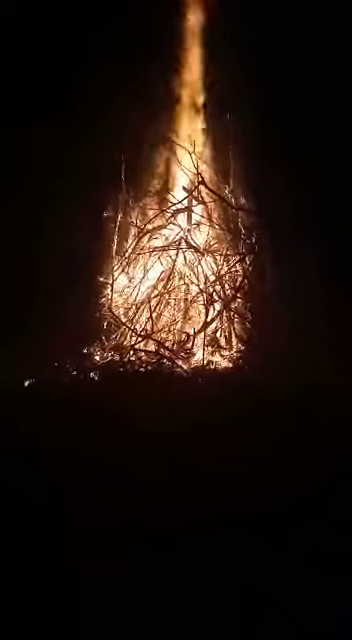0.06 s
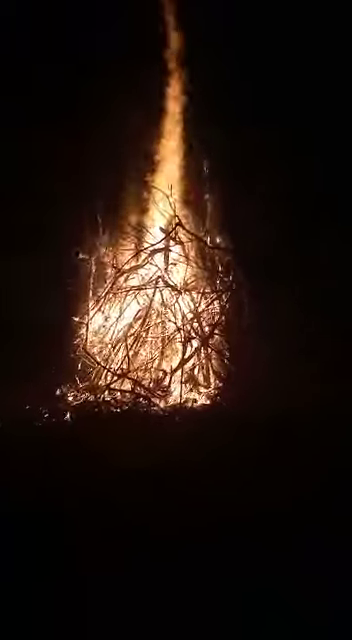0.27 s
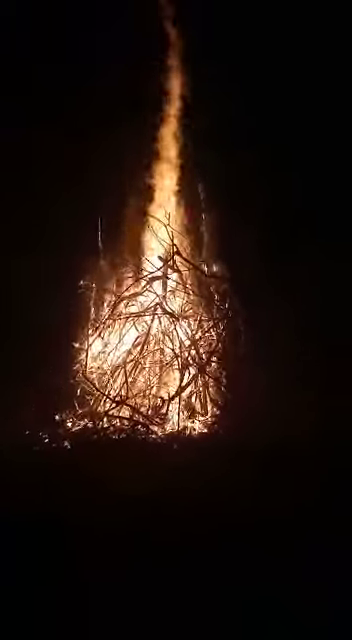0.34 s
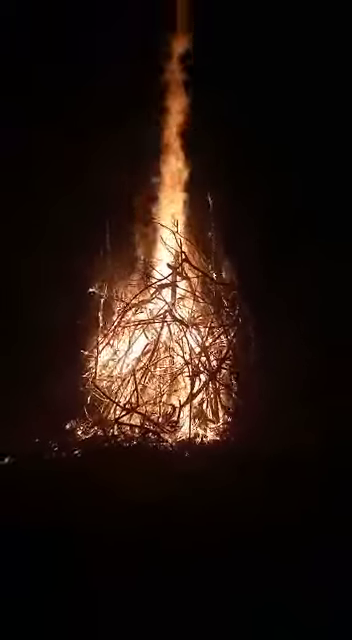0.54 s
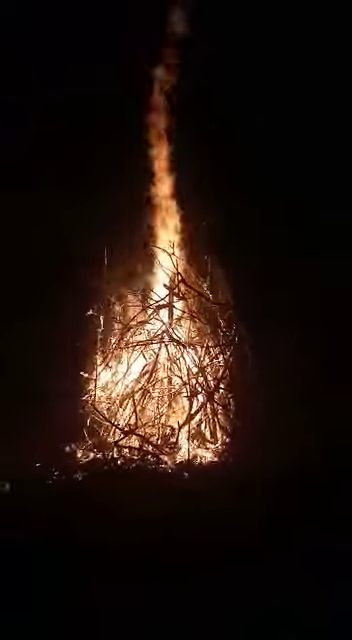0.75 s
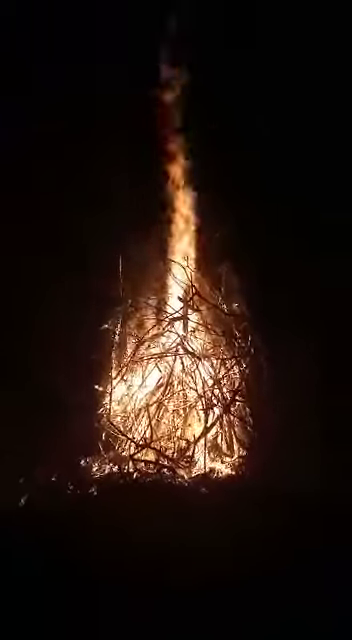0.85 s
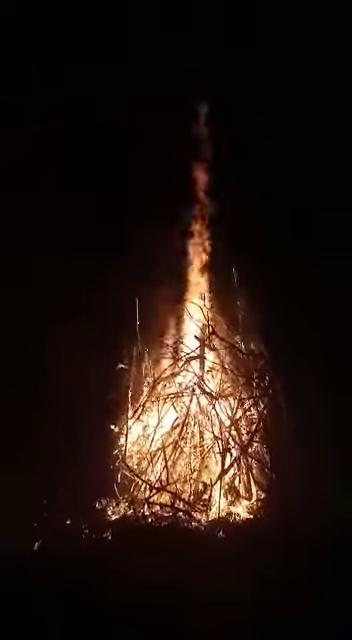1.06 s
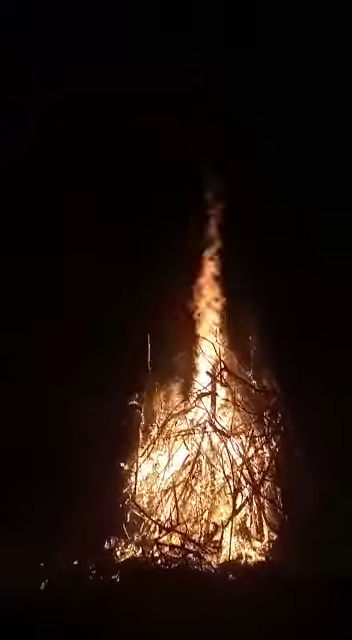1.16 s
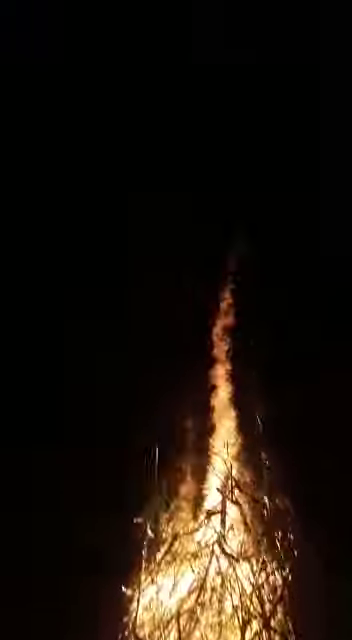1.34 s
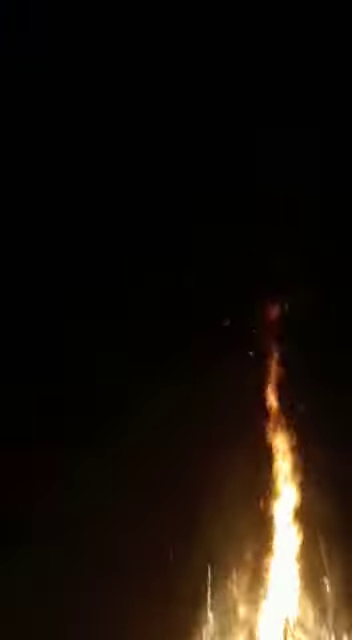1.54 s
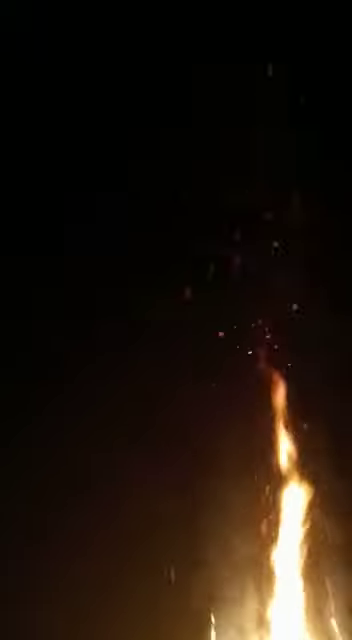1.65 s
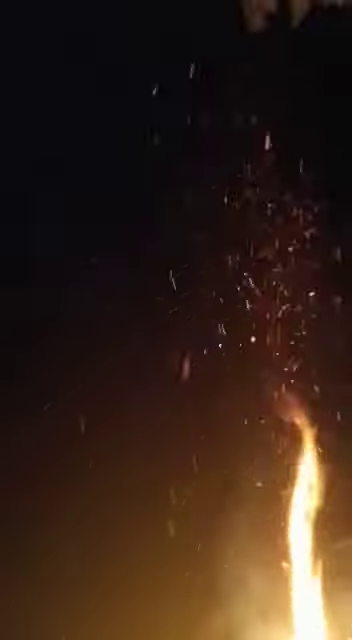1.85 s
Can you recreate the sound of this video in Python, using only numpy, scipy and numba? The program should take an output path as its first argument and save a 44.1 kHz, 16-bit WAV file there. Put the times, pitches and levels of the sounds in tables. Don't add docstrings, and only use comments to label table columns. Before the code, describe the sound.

Big outdoor fire of burning twigs, fizzing and popping, with early dull thumps of a finger on the microphone

```python
import sys
import numpy as np
from scipy import signal
from scipy.fft import rfft, irfft
from scipy.io import wavfile
from scipy.ndimage import uniform_filter1d
from numba import njit

SR = 44100
rng = np.random.default_rng(int(sys.argv[2]) if len(sys.argv) > 2 else 0)


def undo_db(level):
    steps = np.asarray(level, float) / 20
    return 10 ** steps


def digitize_waveform(pressure):
    field = np.atleast_2d(pressure).T
    bounded = np.clip(field, -1, 1)
    quanta = np.round(bounded * 32767).astype(np.int16)
    wavfile.write(sys.argv[1], SR, quanta)


N = 83790

# time_s, treble_passed_db, port_resonance_hz
PORT_OPENING = [(0, -2.5, 5550), (.15, -1.5, 5150), (.2, 2.5, 6240), (.215, -1, 5440), (.28, -9, 5900),
                (.295, -34, 6000), (.36, -26, 6000), (.372, -13, 5700), (.39, -12, 5700), (.396, -23, 5700),
                (.41, -11.5, 5700), (.5, -4.5, 5600), (.53, -8, 5850), (.568, -13, 5700), (.576, -2, 2880),
                (.587, 4, 4770), (.602, 3.5, 5930), (.64, -1.5, 6570), (1.2, -1, 6900), (1.6, -1, 8030),
                (1.9, -2, 7540)]
# time_s, level_db
BED_GAIN = [(0, 0), (.65, -2.5), (.8, 0.5), (.9, -1), (1.0, 3), (1.1, 0.5), (1.2, 1.5), (1.255, -2),
            (1.262, -8), (1.285, -4), (1.31, -5.5), (1.36, -2), (1.45, 1.5), (1.58, -3.5), (1.66, 1),
            (1.75, -0.5), (1.9, 0.5)]
SNAP_S = .0008


def rms_one(x):
    return x / np.sqrt(np.mean(x ** 2) + 1e-20)


def in_time(rows, outside=None):
    time_s, *columns = np.transpose(rows)
    return [np.interp(np.arange(N) / SR, time_s, c, outside, outside) for c in columns]


def drift(rate_hz):
    r = np.exp(-80 * np.pi * rate_hz / SR)
    white = rng.standard_normal(N // 40 + 2002)
    slow = signal.lfilter([1], [1, -2 * r, r * r], white)[2000:]
    return np.interp(np.arange(N) / 40, np.arange(len(slow)), rms_one(slow - slow.mean()))


def band(x, low_hz, high_hz, order=2):
    sos = signal.butter(order, [low_hz, high_hz], "band", fs=SR, output="sos")
    return signal.sosfilt(sos, x + 1e-18)


def colour(x, spectrum):
    hz, db = np.transpose(spectrum)
    log_hz = np.log(np.fft.rfftfreq(N, 1 / SR) + 1)
    gain = undo_db(np.interp(log_hz, np.log(hz), db, -90, -90))
    return rms_one(irfft(rfft(x) * gain, N))


@njit
def resonance(x, hz, width_hz, sr):
    y, r = np.zeros(len(x)), np.exp(-np.pi * width_hz / sr)
    for i in range(2, len(x)):
        drive = (1 - r * r) / 2 * (x[i] - x[i - 2])
        y[i] = drive + 2 * r * np.cos(2 * np.pi * hz[i] / sr) * y[i - 1] - r * r * y[i - 2]
    return y


def clicks(per_s, spread_db, cap):
    size = undo_db(spread_db * np.minimum(rng.exponential(1, N), cap))
    return size * rng.choice([-1, 1], N) * (rng.random(N) < per_s / SR)


def through_port(low, mid, high, top, port_hz):
    port_width_hz = 1800
    port = 2 * band(resonance(mid, port_hz, port_width_hz, SR), 1550, 7330)
    slope = 2 * band(high, 8300, 13800)
    peak = 3 * band(top, 14200, 15900, order=3)
    return np.array([band(low, 1300, 4300), port, slope, peak])


def roar():
    # pitch_hz, level_db
    flame_spectrum = [(13, -72), (22, -100), (51, -6), (108, 0.5), (261, -10), (335, -13.5), (578, -10.5),
                      (1500, -22.5), (5000, -30.5), (6500, -59), (11000, -120)]
    level_db, muffle_hz = -39, 2600
    dip_hz, dip_width_hz, dip_share, dip_end_s = 906, 200, 0.96, 1.26
    white, together = colour(rng.standard_normal(N), flame_spectrum), drift(6.4)
    open_db, bed_gain_db = in_time(PORT_OPENING)[0], in_time(BED_GAIN)[0]
    edges_hz = 20 * 2. ** np.arange(0, 8.6, .7)
    out = np.zeros(N)
    for k, (low_hz, high_hz) in enumerate(zip(edges_hz, edges_hz[1:])):
        share = 0.044 + 0.8 / (1 + (muffle_hz / high_hz) ** 3)
        flicker_db = 0.87 * together + 1.12 * drift(17.0)
        source = np.roll(white, k % 2 * N // 2)
        out += band(source, max(low_hz, 30), high_hz) * undo_db(flicker_db + share * (open_db + bed_gain_db))
    depth = dip_share * np.clip((dip_end_s - np.arange(N) / SR) / 0.2, 0.3, 1)
    out = out - depth * resonance(out, np.full(N, float(dip_hz)), dip_width_hz, SR)
    return undo_db(level_db) * rms_one(out)


def fizz():
    crack_db = [-43.5, -38.5, -55, -51]
    hiss_db = [-59, -37.5, -54.5, -48]
    muffle_share = [0.63, 2.6, 1.35, 1.1]
    cracks_per_s, spread_db, clump_db, grain_colour_db = 520, 2.2, 2, 2.5
    open_db, port_hz = in_time(PORT_OPENING)
    bed_gain_db = in_time(BED_GAIN)[0]
    cracks = clicks(cracks_per_s * undo_db(clump_db * drift(30)), spread_db, 2.0)
    bursts = signal.lfilter([1], [1, -np.exp(-1 / (SNAP_S * SR))], np.abs(cracks))
    flutter_db = 2.0 * drift(25)
    regions = []
    for region_crack_db, region_hiss_db, share in zip(crack_db, hiss_db, muffle_share):
        grains = rms_one(bursts * undo_db(grain_colour_db * drift(120)) * rng.standard_normal(N))
        hiss_level = undo_db(region_hiss_db + flutter_db + 1.4 * drift(3.5))
        hiss = hiss_level * rng.standard_normal(N)
        regions.append(undo_db(share * open_db + bed_gain_db) * (undo_db(region_crack_db) * grains + hiss))
    return through_port(*regions, port_hz).sum(axis=0)


def pops():
    # start_s, peak_db, low_db, high_db, top_db
    snaps = [(0.062, -35, 5, 3, -18), (0.0684, -27, -16, -0.5, -12), (0.0829, -29.5, 0.5, 0.5, -5),
             (0.1107, -29.5, -1, 1, -19), (0.1526, -35.5, 5, 2, -6), (0.3692, -43.5, 7, -1, -3),
             (0.5259, -37, 8.5, -18, -28), (0.5547, -26, -4.5, -25, -23),
             (0.7101, -24, -11, -20, -14), (0.728, -18.5, -10, -16, -27),
             (0.7462, -23.5, -15, -5, -23), (0.7637, -17, -8.5, -16, -27),
             (0.8765, -15, -27, -6.5, -22), (0.8823, -20, -17, -25, -20), (0.896, -27, -13, -1, -4),
             (0.9413, -30.5, -20, 1, -3), (0.9894, -19.5, -12, 0, -25), (1.0166, -24, -1, -15, -31),
             (1.094, -33.5, -23, 7, -6), (1.1134, -26, -6, -3, -12), (1.1395, -18.5, -14, -2.5, -11),
             (1.1577, -21, -11, -3.5, -10), (1.178, -20.5, -21, -2, -7), (1.257, -17, -13, -7, -11),
                  (1.3067, -23.5, -10, -2, -13), (1.3303, -26, -16, 2.5, -10), (1.3516, -23, -11, -1, -21),
                  (1.3626, -21, -20, -28, -25), (1.4071, -16, -13.5, -3.5, -14),
                  (1.4358, -23, -28, -13, -30), (1.442, -24.5, -45, 4, -33), (1.502, -28, -11, -19, -20),
                  (1.5141, -25, -19, -22, -18), (1.529, -26.5, -23, -24, -6), (1.5636, -19, -14, -11, -18),
                  (1.6227, -21.5, -43, -9, -11), (1.6408, -31.5, -21, -13, 0), (1.7146, -22, -15, -20, -18),
                  (1.7384, -22, -26, -6, -8), (1.8342, -24.5, -16, -10, -5), (1.845, -35, -23, -9, 1),
             (0.545, -35, -1, -25, -30), (0.691, -33, -14, -12, -15), (0.793, -36.5, -8, -2, -6),
                   (.803, -35, -12, 2, -8), (0.8234, -33, -10, -13, -19), (0.845, -35, -10, -13, -17),
                   (0.858, -33, -5, -12, -12), (.918, -29, -8, -1, -8), (.9524, -23, -14, -6, -15),
                   (1.047, -31, -11, -4, -12), (1.198, -31, -12, 3, -16), (1.2328, -31, -18, -5, -12),
                   (1.2925, -29, -14, -3, -12), (1.3138, -23.5, -10.5, -6, -14),
                   (1.3222, -31, -16, -14, -15), (1.5083, -23, -7, -12, -15), (1.5466, -35, -18, -10, -12),
                   (1.6149, -25, -12, -8, -12), (1.6622, -31, -14, -11, -12), (1.6872, -28.5, -13, -14, -6),
                   (1.765, -32, -15, -6, -2), (1.796, -27, -24, -13, -14), (1.8654, -33, -12, -8, -4),
                   (.4275, -48, -20, 2, -2), (0.432, -45, -20, -6, 2), (1.2083, -30, -10, -4, -5),
                   (1.654, -40, -11, -3, -6), (1.812, -26, -21, -10, -10), (1.857, -33, -21, -5, -6)]
    # start_s, peak_db, low_db, top_db, length_s
    sputters = [
        (0.631, -20.5, -10.5, -24, 0.014),
        (0.986, -18, -22, -18, 0.0066),
        (1.0148, -18, -15, -26, 0.016),
        (1.072, -21.5, -15, -11, 0.0076),
        (1.4683, -26, -14, -20, 0.0071),
        (1.48, -25.5, -16, -21, 0.0048),
        (1.5668, -18.5, -23, -15, 0.011),
        (1.582, -25, -21, -5, 0.015),
    ]
    region_db = [3.3, 2.83, 5.2, 12]
    tail_tilt_db = [3.5, 1, 4, -15]
    echo_s, echo_db, tail_s, tail_db = .002, -9, .007, -16
    crack_s, crack_db, sputter_high_db = .0001, 5, -11

    t = np.arange(2000) / SR
    out, port_hz = np.zeros(N + len(t)), in_time(PORT_OPENING)[1]

    def decay(start_s, tau_s):
        return np.exp(-np.maximum(t - start_s, 0) / tau_s) * (t >= start_s)

    rows = [(*row, 0) for row in snaps]
    rows += [(s, db, low_db, sputter_high_db, top_db, length_s) for s, db, low_db, top_db, length_s in sputters]
    for s, db, low_db, high_db, top_db, length_s in rows:
        noise, i = rng.standard_normal((5, len(t))), int(s * SR)
        noise[0, :2] = 2, -2
        if length_s == 0:
            body = decay(0, SNAP_S) + undo_db(crack_db) * decay(0, crack_s)
        else:
            uneven_db = 4 * uniform_filter1d(noise[4], size=40) * np.sqrt(40)
            body = (t < length_s) * undo_db(uneven_db - 500 * t)
        echo = undo_db(echo_db) * decay(length_s + echo_s, SNAP_S)
        tail = undo_db(tail_db) * decay(length_s, tail_s)
        shape = body + undo_db(np.c_[tail_tilt_db]) * (echo + tail)
        source = shape * (noise[0] + .6 * noise[:4])
        parts = through_port(*source, np.full(len(t), port_hz[i]))
        peaks = undo_db(db + np.add(region_db, [low_db, 0, high_db, top_db]))
        out[i:i + len(t)] += (peaks / np.abs(parts).max(axis=1)) @ parts
    return out[:N]


def finger():
    # time_s, level_db, brightness_db
    strokes = [
        [(.15, -52.5, 6), (.19, -35.5, -5), (.216, -30.5, -3.5), (.226, -13, -7.5), (.25, -13, -6.5),
         (.275, -20, -4), (.29, -28, -8.5), (.3, -63, -22)],
        [(.364, -46, -16), (.368, -13.5, -19.5), (.385, -18, -2), (.395, -18, -17), (.43, -15.5, -10.5),
         (.46, -21, -10), (.476, -18.5, -9.5), (.485, -44, 4), (.5, -54, 4)],
        [(.55, -40, -30), (.57, -36.5, -4), (.585, -19, -5), (.592, -33, -3), (.605, -50, 12)],
    ]
    # pitch_hz, level_db_per_hz
    dull_spectrum = [(15, -48), (25, -8.5), (180, -0.5), (253, -2), (415, -0.5), (649, -12), (940, -22),
                     (1000, -63), (1300, -55), (2200, -120)]
    scratch_spectrum = [(530, -10), (900, -4.5), (1620, -8), (2920, -18.5), (4670, -28.5), (9000, -49),
                        (11700, -86), (19800, -120)]
    # start_s, peak_db, pitch_hz
    pumps = [
        (0.285, -14.5, 105),
        (0.323, -19.5, 101),
        (.3675, -13, 530),
        (0.403, -5.5, 92),
        (0.469, -6, 101),
        (.582, -15.5, 64),
    ]
    slips_per_s, slip_spread_db, pump_cycles = 830, 4.2, 0.79
    slips = rms_one(clicks(slips_per_s, slip_spread_db, 1.7)) + 1.22 * rng.standard_normal(N)
    dull, scratch = colour(slips, dull_spectrum), colour(slips, scratch_spectrum)
    dull = dull / np.sqrt(uniform_filter1d(dull ** 2, size=600) + 0.097)
    out = np.zeros(N)
    for stroke in strokes:
        db, bright_db = in_time(stroke, -120)
        out += undo_db(db) * (dull + undo_db(bright_db) * scratch)
    for s, db, hz in pumps:
        turns = np.maximum(np.arange(N) / SR - s, 0) * hz
        out += undo_db(db) * 4 * np.sin(2 * np.pi * turns) * turns * np.exp(-2 * turns / pump_cycles)
    return band(np.tanh(out), 50, 7000)


def whistles():
    # start_s, length_s, pitch_hz, width_hz, level_db
    jets = [
        (1.68, .26, 2480, 300, -47.5),
        (1.15, .1, 1350, 280, -47.5),
        (1.2, .06, 850, 300, -50),
        (1.18, .055, 600, 90, -47),
        (1.7, .045, 3130, 200, -54),
    ]
    t, out = np.arange(N) / SR, np.zeros(N)
    for s, length_s, hz, width_hz, db in jets:
        track_hz = hz * (1 + 0.012 * drift(21))
        tone = resonance(rng.standard_normal(N), track_hz, width_hz, SR)
        tone = resonance(tone, track_hz, width_hz, SR) * undo_db(2.5 * drift(30))
        level = np.sqrt(uniform_filter1d(tone ** 2, size=2400))
        fade = np.clip(np.minimum(t - s, s + length_s - t) / 0.012, 0, 1)
        out += undo_db(db) * tone / level * fade
    return out


def scene():
    return (roar() + fizz() + pops() + finger() + whistles())[None]


def band_limit(x):
    return signal.sosfilt(signal.butter(12, 16970, fs=SR, output="sos"), x)


def record(dry):
    limit_db, limit_ratio, release_db_per_s, cutoff_hz = -19.5, 0.4, 313, 16600
    fall_db = release_db_per_s * np.arange(N) / SR
    treble_db = 20 * np.log10(np.abs(band(dry[0], 3800, 14700)) + 1e-9)
    over_db = np.maximum(treble_db - limit_db, 0)
    held_db = np.maximum.accumulate(over_db + fall_db) - fall_db
    gain = undo_db(-limit_ratio * signal.lfilter([.01], [1, -.99], held_db))
    top_cut = signal.cheby2(8, 40, cutoff_hz, fs=SR, output="sos")
    return band_limit(signal.sosfilt(top_cut, dry * gain))


dry = scene()
out = record(dry)
digitize_waveform(out)
```